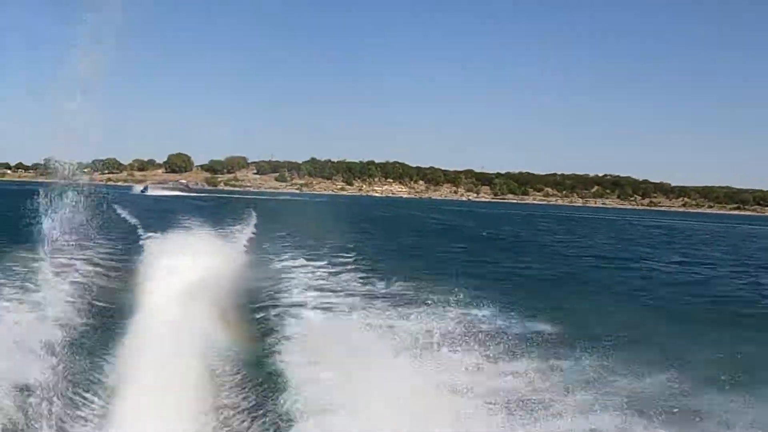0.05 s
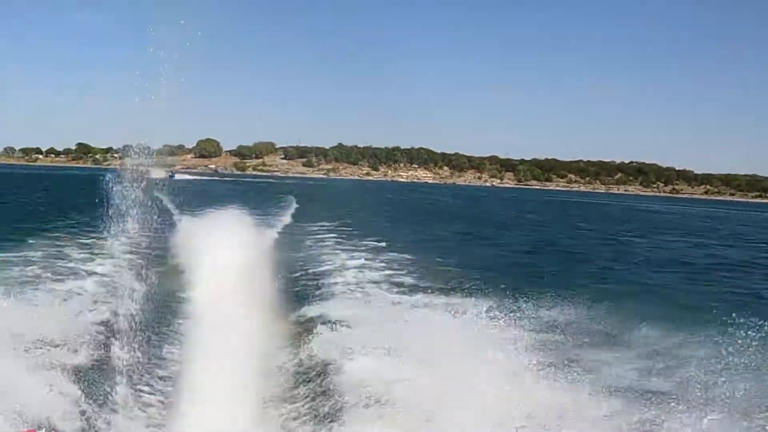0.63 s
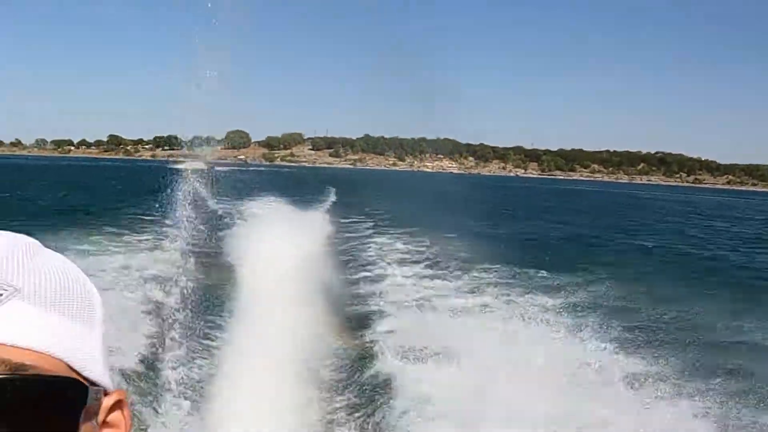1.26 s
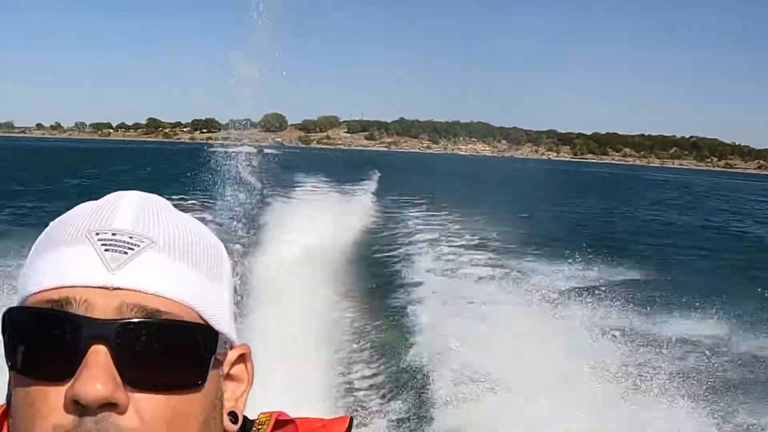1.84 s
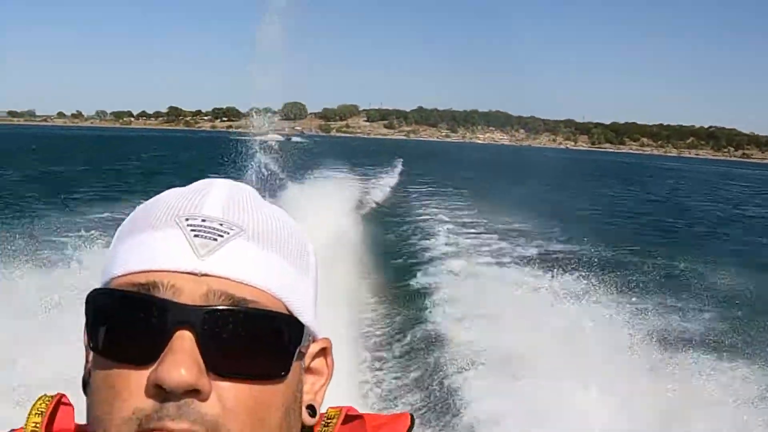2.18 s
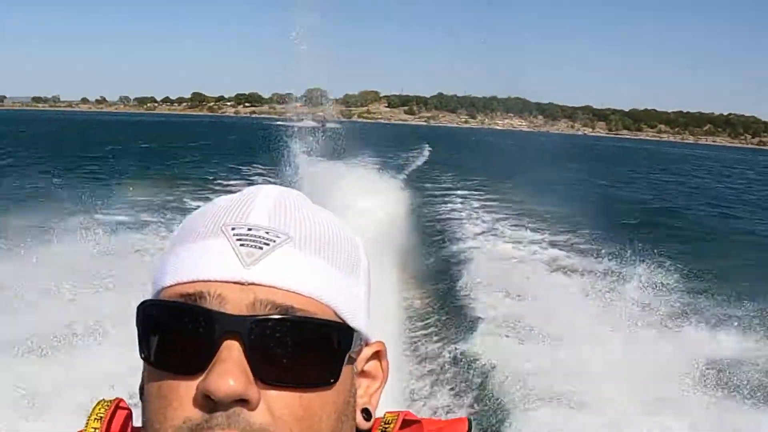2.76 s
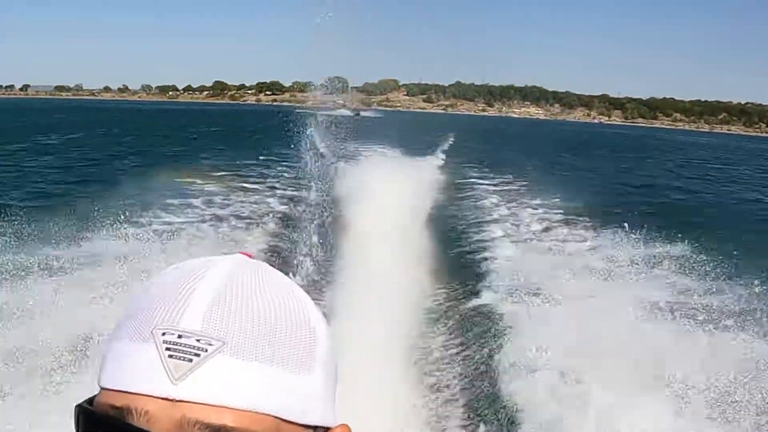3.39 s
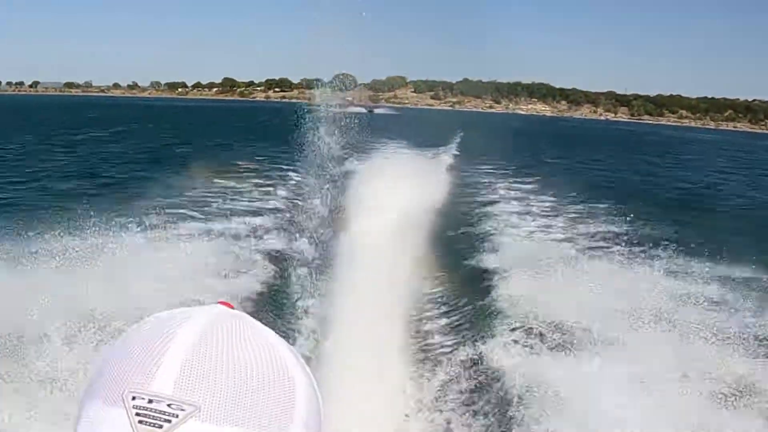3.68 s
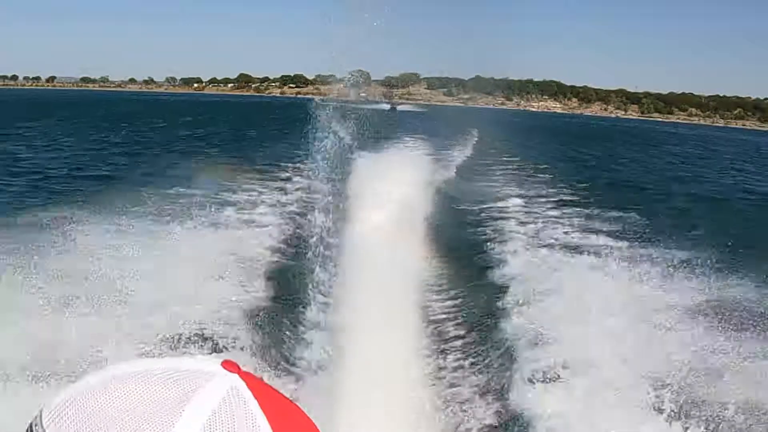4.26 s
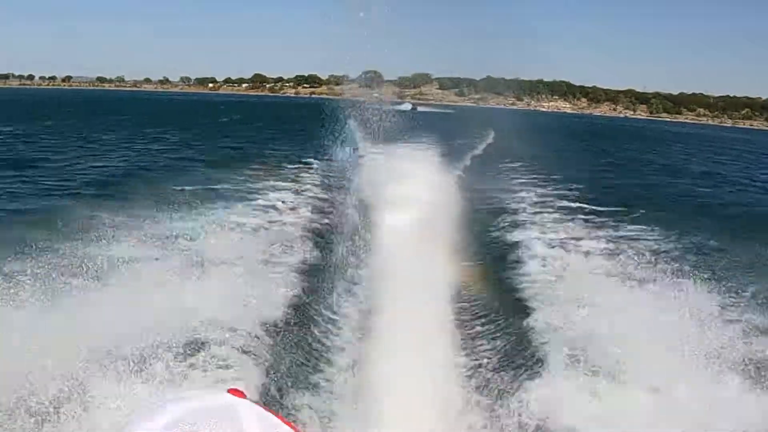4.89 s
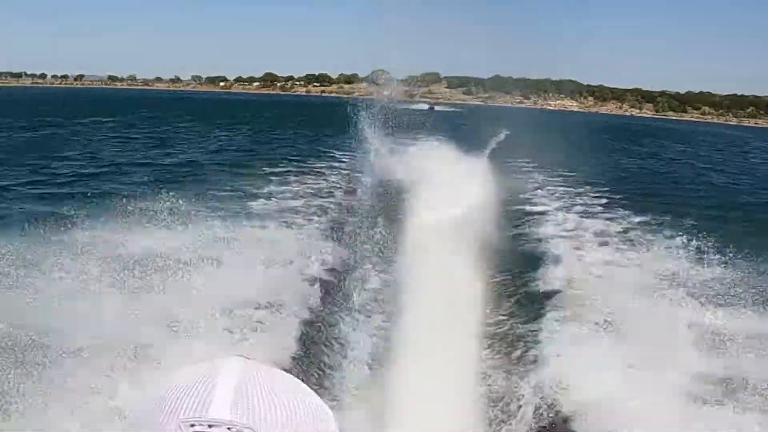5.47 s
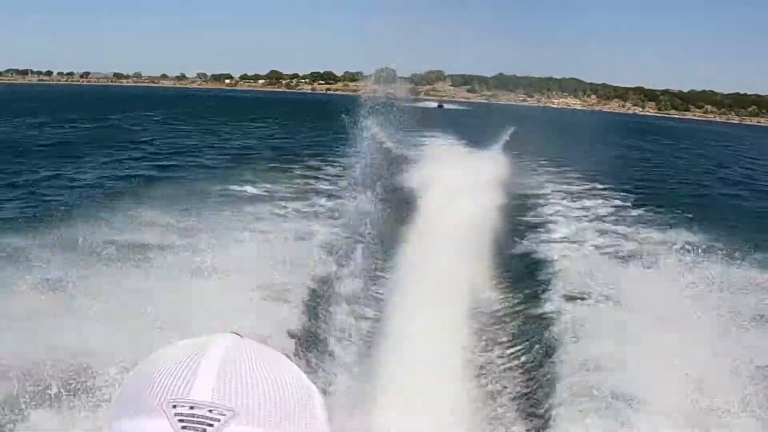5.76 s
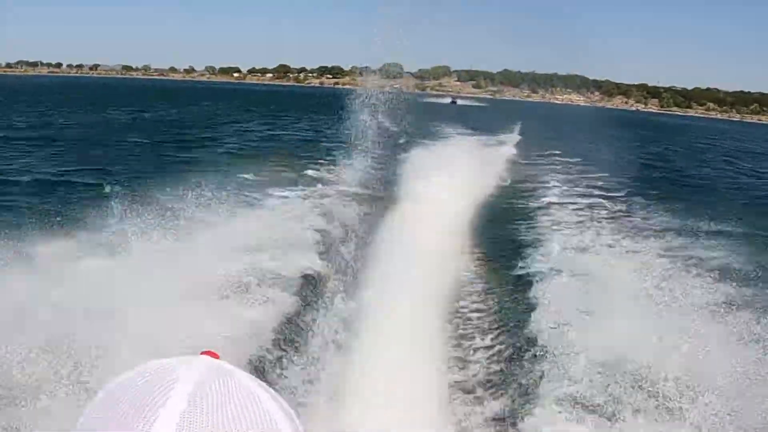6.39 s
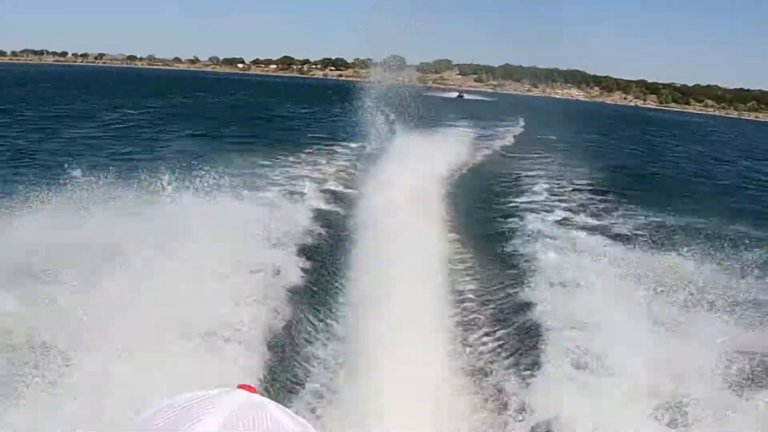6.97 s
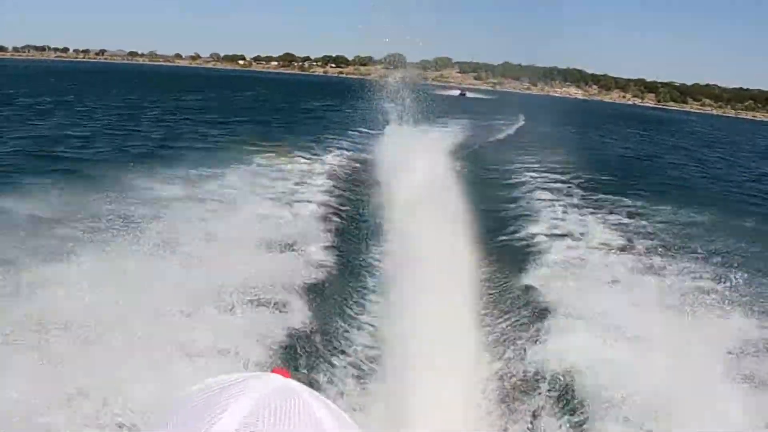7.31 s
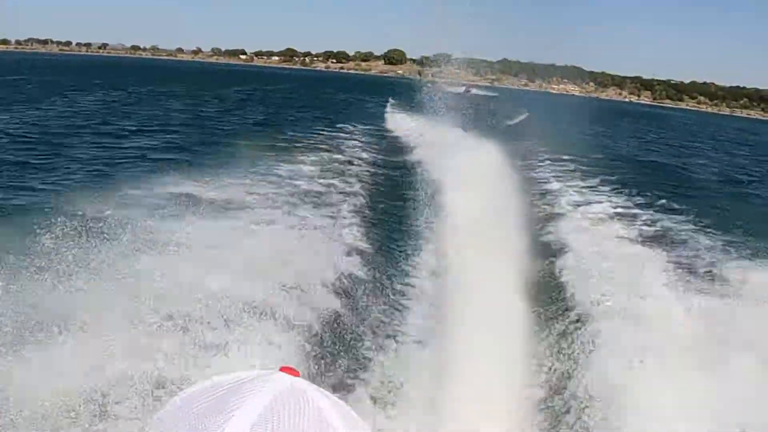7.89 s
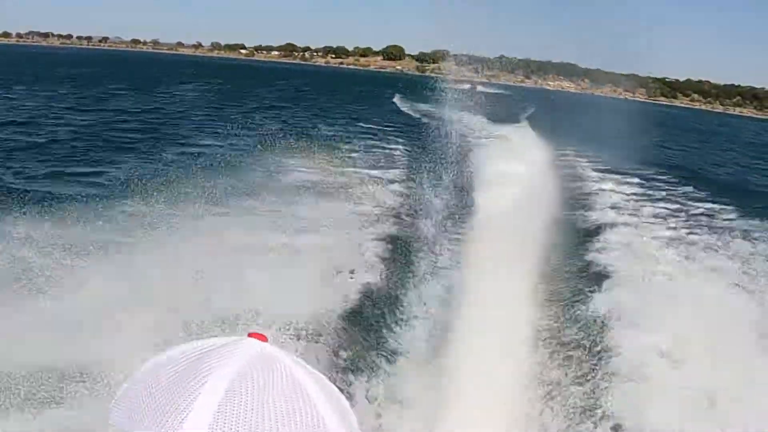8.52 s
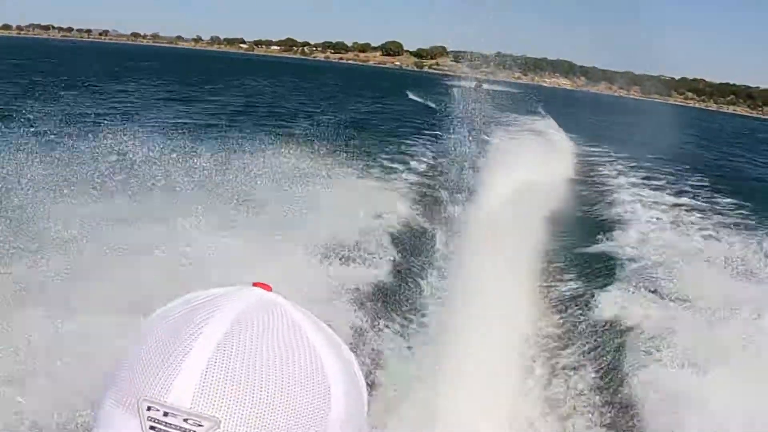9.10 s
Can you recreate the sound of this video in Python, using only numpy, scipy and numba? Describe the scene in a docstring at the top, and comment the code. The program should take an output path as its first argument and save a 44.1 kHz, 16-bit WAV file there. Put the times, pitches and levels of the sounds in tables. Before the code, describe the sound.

Steady personal watercraft engine hum with churning spray and wind rumble, broken by frequent hollow, slightly squeaky knocks.

```python
"""Water scooter on a choppy lake.

A fast ride is heard from a small waterproof camera mounted on the craft. The exhaust drones at the
firing rate, the jet and wake rush through the resonances of the camera case, and wind buffets it.
The hull bounces on the chop, so the mount knocks and chirps; one sheet of spray spatters the case."""
import sys
import numpy as np
from scipy import signal
from scipy.fft import rfft, irfft, next_fast_len
from scipy.io import wavfile
from numba import njit

SR = 44100
rng = np.random.default_rng(int(sys.argv[2]) if len(sys.argv) > 2 else 0)


def master_out(mix):
    """Clip the mix to full scale and print it as 16-bit PCM to the path in sys.argv[1]."""
    frames = np.transpose(np.atleast_2d(mix))
    ceiling = np.clip(frames, -1, 1)
    pcm = np.round(ceiling * 32767).astype(np.int16)
    wavfile.write(sys.argv[1], SR, pcm)


N = 407925
T = np.arange(N) / SR

# Engine speed: time_s, firing_hz
FIRING_RATE = [(0.0, 175.4), (0.05, 174.2), (0.2, 174.6), (0.62, 171.6), (1.29, 162.6), (1.39, 160.8),
               (2.6, 169.2), (3.5, 165.4), (4.87, 179), (6.05, 171.2), (7.09, 184.7), (7.63, 180.1),
               (7.91, 176.9), (8.68, 163.5), (9.02, 162.5), (9.25, 164.1)]
# Weak engine orders: multiple_of_firing_rate
WEAK_ORDERS = [.5, .75, 1.5, 1.75, 2, 3]
# Their strengths: relative_db
WEAK_LEVELS = [-24, -25, -21.5, -29.5, -25, -36]
# Effect of the outlet lying clear of the water: time_s, drone_lift_db, extra_weak_order_lift_db
OUTLET_CLEARANCE = [(0, -0.5, -4), (1, 0, 6), (1.6, 0.5, 4), (2.1, 1.6, 2.5), (3, 1.9, -2), (3.8, -0.3, 3),
                    (4.3, -0.6, -1), (5.3, 1.3, -5), (6.2, 1.4, -2.5), (6.6, 1, -2.5), (7.1, -1.5, 1.5),
                    (7.7, 2.2, -5), (8.2, 0, -2.5), (9.25, -0.5, 3)]


def exhaust(gain_db=-21.5, silencer_hz=168.4, width_hz=35, jitter_rad=0.14, bob_db=0.6, flutter_db=0.77):
    """Periodic firing drives a tone, loudest at silencer resonance; unequal cylinders add weak orders."""
    (firing_hz,) = curves(FIRING_RATE)
    clear_db, weak_lift_db = curves(OUTLET_CLEARANCE)
    (gust_db,) = curves(GUST_LEVELS)
    resonance = 1 / (1 + (2 * (firing_hz - silencer_hz) / width_hz) ** 2)
    phase = 2 * np.pi * np.cumsum(firing_hz) / SR + jitter_rad * wander(40)
    weak = sum(undb(db) * np.sin(order * phase + rng.uniform(0, 2 * np.pi))
               for order, db in zip(WEAK_ORDERS, WEAK_LEVELS))
    drone = unit(np.sin(phase) + undb(weak_lift_db) * weak)
    # Water washing over the outlet makes the level bob and flutter, more so in gusts.
    gustiness = undb(gust_db - gust_db.mean()) ** 0.36
    wash_db = (bob_db * hull_bobbing() + flutter_db * wander(30)) * gustiness
    return drone * resonance * undb(gain_db + clear_db + wash_db)


def hull_bobbing(chop_hz=7.8, scatter=0.22):
    """Forced oscillation: waves rock the hull at an uneven rate and depth (rms 1)."""
    rate_hz = chop_hz * (1 + scatter * wander(9))
    return unit(np.sin(2 * np.pi * np.cumsum(rate_hz) / SR) * undb(2 * wander(2.5)))


# Rush of the wake: time_s, churn_db, hiss_db
WAKE_LEVELS = [(0.0, -31, -46.5), (0.41, -33.5, -43.5), (0.82, -30.5, -42), (1.33, -34, -43),
               (1.69, -32, -41.5), (3.92, -33.5, -42.5), (4.23, -34.5, -44), (4.87, -32.5, -42.5),
               (6.02, -31.5, -42), (6.69, -34.5, -45), (7.25, -31, -41.5), (9.2, -33, -43.5)]
# Spectra of churning water and of spray: frequency_hz, density_db
CHURN_SPECTRUM = [(100, -6.5), (230, 6.5), (320, 1.5), (420, 1.5), (800, -3), (1150, -4.5), (1600, -8.5),
                  (2100, -3), (3000, -15), (4500, -25.5), (9000, -57.5)]
HISS_SPECTRUM = [(1500, -20.5), (3000, 0), (4200, 3), (4900, -2), (5800, -9.5), (7000, -14), (9000, -16),
                 (10000, -20), (11000, -30), (12300, -30.5), (13500, -37.5), (15500, -40.5)]


def wake(churn_lift_db=1.0, churn_flicker_db=1.45, hiss_flicker_db=0.67, drop_spread_db=3.5):
    """Broadband excitation: turbulent water and countless drops ring the resonances of the case."""
    churn_db, hiss_db = curves(WAKE_LEVELS)
    churn = unit(through_case(rng.standard_normal(N), CHURN_SPECTRUM))
    drops = rng.standard_normal(N) * undb(drop_spread_db * rng.standard_normal(N))
    hiss = unit(through_case(drops, HISS_SPECTRUM))
    churn *= undb(churn_db + churn_lift_db + churn_flicker_db * wander(35))
    hiss *= undb(hiss_db + hiss_flicker_db * wander(25))
    return churn + hiss


# Wind strength: time_s, relative_db
GUST_LEVELS = [(0, -30), (0.7, -26.5), (1.3, -31), (2.3, -30.5), (2.9, -29.5), (3.8, -29.5), (4.6, -31.5),
               (5.3, -27.5), (6.1, -28), (6.7, -30), (7.4, -29), (8.4, -25.5), (9.25, -29.5)]
# Large eddies: centre_s, lift_db
EDDIES = [(0.5, 0.5), (2.5, 5.5), (3.73, 7), (5.41, 4.5), (6.37, 6), (7.91, 4.5)]
# Wind rumble: frequency_hz, density_db
WIND_SPECTRUM = [(8, 6), (24, 7), (42, 0.5), (80, 1), (105, -2.5), (135, 2.5), (200, -4.5), (260, -7.5),
                 (400, -18), (1000, -66)]


def wind(gain_db=2.67, buffet_db=1.74, eddy_s=0.017):
    """Turbulent pressure at the microphone rumbles in quick buffets; a few large eddies boom."""
    (gust_db,) = curves(GUST_LEVELS)
    boom_db = sum(db * bell_curve(centre_s, eddy_s) for centre_s, db in EDDIES)
    rumble = unit(colour(rng.standard_normal(N), WIND_SPECTRUM))
    return rumble * undb(gust_db + boom_db + gain_db + buffet_db * wander(22))


# Jolts of the mount: strike_s, relative_thud_db, relative_slip_db
JOLTS = [(0.919, -25, -26), (1.294, -21, -27), (2.131, -34.5, -33), (3.006, -28.5, -35.5),
         (3.675, -23, -27.5), (4.025, -22.5, -18), (4.122, -21.5, -24), (4.224, -25.5, -35),
         (4.424, -25, -22), (4.572, -27, -32), (4.768, -31, -36), (4.996, -23, -29), (5.124, -23, -31),
         (5.409, -30, -38), (5.683, -22.5, -23), (5.807, -27, -26.5), (5.939, -24.5, -28.5),
         (6.445, -21.5, -22), (6.564, -21.5, -21), (7.038, -23, -26), (7.156, -22.5, -30.5),
         (7.277, -22.5, -27.5), (7.432, -26, -26.5), (7.52, -32, -32), (7.653, -23.5, -25.5),
         (7.866, -22, -21), (7.967, -26.5, -28.5), (8.9, -27, -33), (9.103, -27, -28.5)]
# Spectra of the two parts of a knock: frequency_hz, density_db
THUD_SPECTRUM = [(100, -18.5), (330, -2.5), (600, 7.5), (900, -3), (1400, -0.5), (2100, -13), (2900, -16.5),
                 (4200, -47), (9000, -61)]
CRACK_SPECTRUM = [(200, -25.5), (1000, -6.5), (2100, -1), (2800, 6), (3300, -5), (4000, -23), (5500, -35),
                  (9000, -58.5)]


def mount_knocks(thud_gain_db=29.0, crack_gain_db=35.5, crack_growth=1.328):
    """Impact: the mount hits its stop with a hollow thud and a crack that grows nonlinearly with slip."""
    _, thud_db, slip_db = np.transpose(JOLTS)
    thud = impact_force(thud_db + thud_gain_db,
                        bounce_db=-2.5, bounce_s=0.00494, rattle_db=-21.5, rattle_s=0.013)
    crack = impact_force(crack_growth * slip_db + crack_gain_db,
                         bounce_db=-7.5, bounce_s=0.007, rattle_db=-26, rattle_s=0.005)
    return through_case(thud, THUD_SPECTRUM) + through_case(crack, CRACK_SPECTRUM)


def impact_force(levels_db, bounce_db, bounce_s, rattle_db, rattle_s, contact_s=0.0027):
    """Contact force: the parts scrape together, strike, rebound once and rattle out."""
    force = np.zeros(N + SR)
    lead = SR // 50
    t = np.arange(-lead, SR // 16) / SR
    for (strike_s, *_), db in zip(JOLTS, levels_db):
        blow = undb(rattle_db) * rng.standard_normal(len(t)) * cusp(t, contact_s, rattle_s)
        blow[lead] += 1
        rebound = lead + int(bounce_s * (0.5 + rng.random()) * SR)
        blow[rebound] += undb(bounce_db)
        start = int(strike_s * SR) - lead
        force[start:start + len(t)] += undb(db) * blow
    return force[:N]


def mount_chirps(gain_db=4.0, pitch_hz=2140, wander_hz=95, rough_db=2, lead_s=0.0024):
    """Friction: the joint slips around each knock, and a rough squeak swells and dies."""
    swell = np.zeros(N + SR)
    t = np.arange(-SR // 20, SR // 20) / SR
    shape = cusp(t, rise_s=0.0067, fall_s=0.015)
    for strike_s, _, slip_db in JOLTS:
        start = int((strike_s - lead_s + t[0]) * SR)
        swell[start:start + len(t)] += undb(slip_db + gain_db) * shape
    phase = 2 * np.pi * np.cumsum(pitch_hz + wander_hz * wander(400)) / SR
    squeak = unit(np.sin(phase) * undb(rough_db * wander(350)))
    return swell[:N] * squeak


# Small waves striking the hull: start_s, level_db, pitch_hz
WAVE_SLAPS = [(0.171, -18, 542), (1.975, -20, 630), (7.156, -16, 507), (8.9, -28, 451), (9.104, -24, 471)]
# Modes of the hull: multiple_of_pitch, relative_db, decay_s
HULL_MODES = [(1, 3.5, 0.0044), (1.2, -16, 0.0034), (1.62, -10, 0.0017)]


def hull_slaps():
    """Damped free vibration: each wave gives the hull a short, hollow ring."""
    out = np.zeros(N + SR)
    t = np.arange(SR // 12) / SR
    for start_s, level_db, pitch_hz in WAVE_SLAPS:
        ring = sum(undb(db) * np.sin(2 * np.pi * ratio * pitch_hz * t) * np.exp(-t / decay_s)
                   for ratio, db, decay_s in HULL_MODES)
        start = int(start_s * SR)
        out[start:start + len(t)] += undb(level_db) * ring
    return out[:N]


# Bunches of drops: centre_s, patter_db, half_width_s, mist_db
SPRAY_BURSTS = [(0.747, -31, 0.0084, -50), (0.837, -26.5, 0.011, -53), (0.862, -31, .012, -51),
                (0.919, -25, 0.0039, -29), (0.958, -19.5, 0.014, -51), (0.982, -23, 0.013, -37),
                (1.023, -27, 0.015, -50)]
# Spectra of landing drops and of fine mist: frequency_hz, density_db
PATTER_SPECTRUM = [(150, -21), (450, 7), (800, 5), (1100, 5.5), (1400, -4), (2100, -2), (2900, -11),
                   (4200, -15), (9000, -55)]
MIST_SPECTRUM = [(1000, -15), (2200, 1), (3200, -1), (4300, -8), (5700, -12), (7000, -28), (10000, -43)]


def spray(drops_per_s=2500, spread_db=3):
    """Shot noise: drops land at random and patter on the case; a direct hit bursts into mist."""
    arrivals = rng.random(N) < drops_per_s / SR
    drops = arrivals * rng.standard_normal(N) * undb(spread_db * rng.standard_normal(N))
    patter = unit(through_case(drops, PATTER_SPECTRUM))
    mist = unit(through_case(drops, MIST_SPECTRUM))
    return sum((undb(patter_db) * patter + undb(mist_db) * mist) * bell_curve(centre_s, half_width_s)
               for centre_s, patter_db, half_width_s, mist_db in SPRAY_BURSTS)


# Resonances of the camera case: centre_hz, width_hz, lift_db
CASE_MODES = [(247, 17, 3), (625, 79, 3.5), (1348, 194, 13), (1907, 330, 9.5), (2240, 284, 6),
              (2592, 355, 6), (3553, 360, 5.5), (3960, 310, 8), (4326, 230, 7.5), (5770, 330, 5),
              (6400, 500, 5), (7320, 500, 3)]


def through_case(x, spectrum):
    """Resonance: the case lifts the spectrum of a source at each of its modes."""
    return colour(x, spectrum, CASE_MODES)


def colour(x, spectrum, modes=()):
    """Minimum-phase filter: a smooth spectrum with a peak at each mode."""
    size = next_fast_len(N + 8192, True)
    bin_hz = np.fft.rfftfreq(size, 1 / SR) + 1e-3
    hz, db = np.transpose(spectrum)
    gain_db = np.interp(np.log(bin_hz), np.log(hz), db)
    for centre_hz, width_hz, lift_db in modes:
        gain_db += lift_db * 2 ** -((2 * (bin_hz - centre_hz) / width_hz) ** 2)
    # Folding the cepstrum onto positive time makes the filter causal.
    cepstrum = irfft(np.log(undb(gain_db)), size)
    cepstrum[1:size // 2] *= 2
    cepstrum[size // 2 + 1:] = 0
    return irfft(rfft(x, size) * np.exp(rfft(cepstrum)), size)[:N]


def undb(db):
    """Decibels to amplitude ratio."""
    return 10 ** (np.asarray(db) / 20)


def unit(x):
    """Normalisation to rms 1."""
    return x / np.sqrt(np.mean(x ** 2))


def curves(table):
    """Linear interpolation of each column over time."""
    time_s, *columns = np.transpose(table)
    return [np.interp(T, time_s, column) for column in columns]


def wander(rate_hz):
    """Random modulation: Gaussian values joined by lines, rms near 1."""
    steps = rng.standard_normal(4096)
    return np.interp(T * rate_hz, np.arange(len(steps)), steps) * np.sqrt(3 / 2)


def bell_curve(centre_s, half_width_s):
    """Gaussian envelope with a peak of 1."""
    return np.exp(-0.5 * ((T - centre_s) / half_width_s) ** 2)


def cusp(t, rise_s, fall_s):
    """Exponential growth up to t = 0, then exponential decay."""
    return np.exp(-np.maximum(-t / rise_s, t / fall_s))


def scene():
    """Superposition: engine, water, wind and mount add at one close microphone."""
    return (exhaust() + wake() + wind() + mount_knocks() + mount_chirps() + hull_slaps() + spray())[None]


@njit
def follow(x, attack_s, release_s):
    """Envelope detection: a rectified signal is smoothed with separate rise and fall times."""
    out, level = np.empty(len(x)), 0.
    for i in range(len(x)):
        level += (x[i] - level) / (SR * (attack_s if x[i] > level else release_s))
        out[i] = level
    return out


def record(dry, split_hz=700, threshold_db=-20.5, strength=1.4, delay_s=0.008, cutoff_hz=15700):
    """Compression: the camera turns its upper band down just after loud peaks, then cuts the top."""
    low = signal.sosfiltfilt(signal.butter(2, split_hz, fs=SR, output="sos"), dry[0])
    high = dry[0] - low
    envelope = follow(np.abs(high), attack_s=0.003, release_s=0.075)
    delayed = np.interp(T - delay_s, T, envelope)
    gain = np.maximum(delayed / undb(threshold_db), 1) ** -strength
    lowpass = signal.ellip(8, 0.2, 70, cutoff_hz, fs=SR, output="sos")
    return signal.sosfilt(lowpass, low + gain * high)[None]


dry = scene()
out = record(dry)
master_out(out)
```